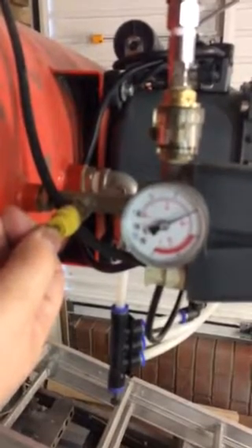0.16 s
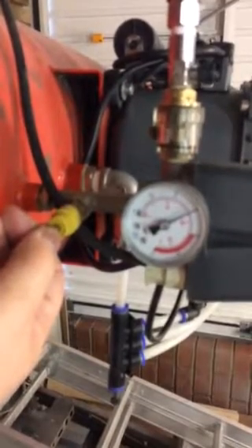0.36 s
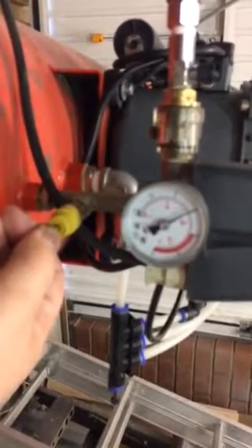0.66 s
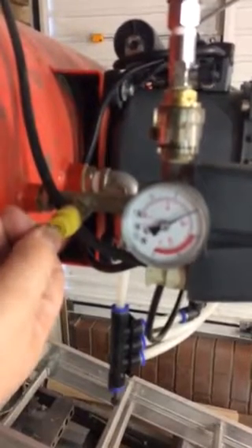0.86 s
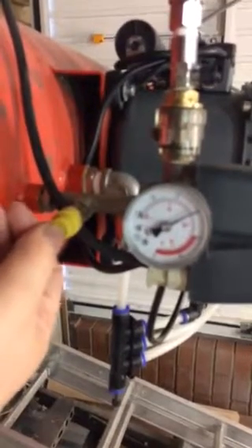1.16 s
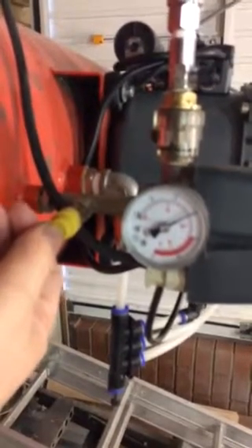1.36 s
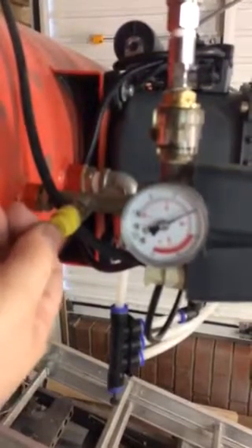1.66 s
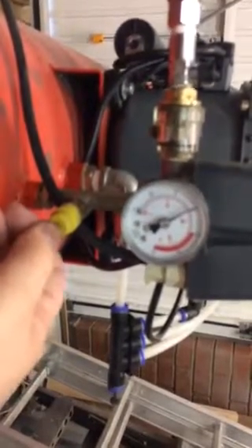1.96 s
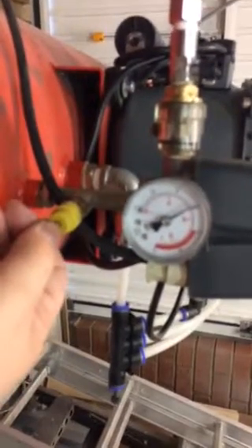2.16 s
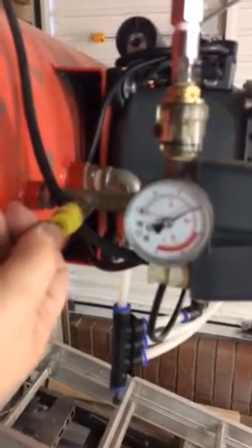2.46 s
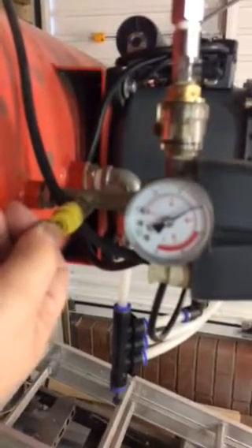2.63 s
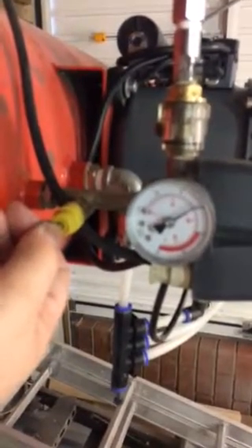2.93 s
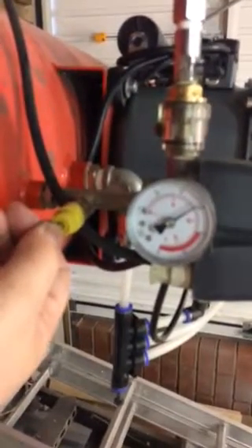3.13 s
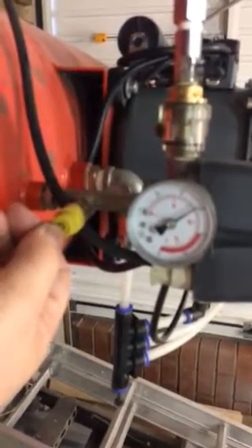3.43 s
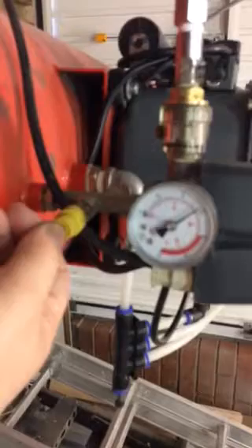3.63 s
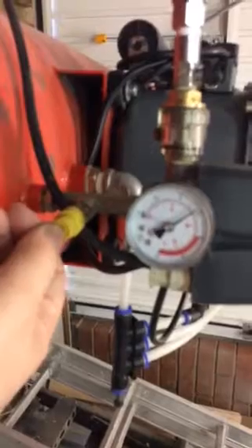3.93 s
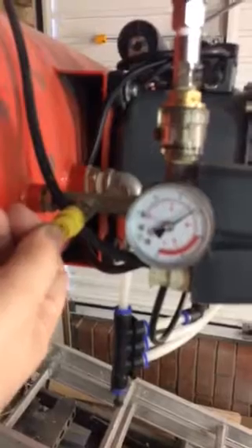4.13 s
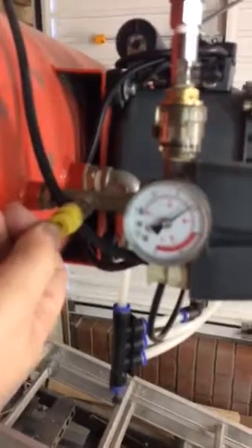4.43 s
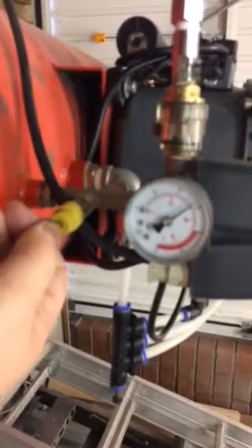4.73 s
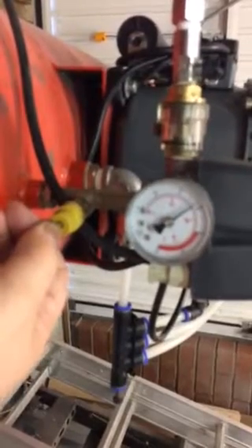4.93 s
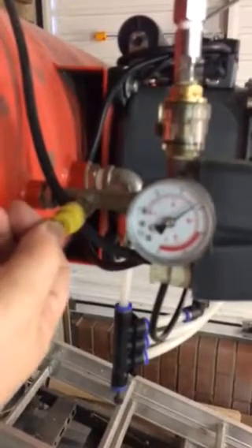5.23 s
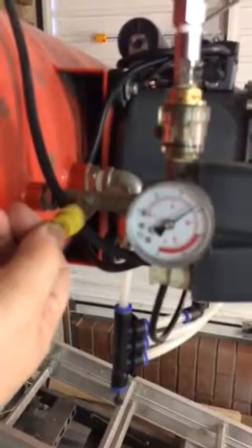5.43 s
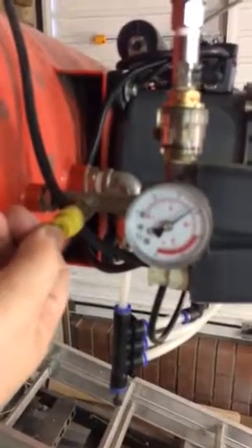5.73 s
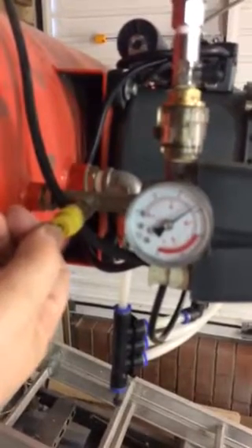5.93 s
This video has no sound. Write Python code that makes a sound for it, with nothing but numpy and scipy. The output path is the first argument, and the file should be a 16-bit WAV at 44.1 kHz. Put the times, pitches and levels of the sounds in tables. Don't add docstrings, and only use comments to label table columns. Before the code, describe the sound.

Sound starts in mid-blast: a loud, dense, steady roar of compressed air, broad from low mids to bright hiss, with uneven low buffeting on the close microphone. At 0.9 s it shuts abruptly with a low rebound thump and a short wall ring of about 0.3 s. The quiet gap holds faint distant hum and street rumble, recovering after the blast and swelling around 1.5-1.8 s. A faint tick and thin bright hiss begin near 1.9 s, rising into a thump and the long blast, 2.0-3.6 s. Quiet again, with a low rumble swell near 4.1 s. From 4.3 s the hiss grows, a dull clack and strong thump open a shorter blast, 4.5-5.3 s. After another quiet gap, a faint tick and leaking hiss from 5.8 s lead to a last blast at 5.9 s, still roaring at the end, about 6.1 s. Dry, close, essentially centred, slightly overloaded.

```python
import sys
import numpy as np
from scipy import signal
from scipy.fft import rfft, irfft, next_fast_len
from scipy.io import wavfile
from scipy.ndimage import uniform_filter1d

SR = 44100
rng = np.random.default_rng(int(sys.argv[2]) if len(sys.argv) > 2 else 0)


def waveform_to_disk(signal):
    frames = np.transpose(np.atleast_2d(signal))
    scaled = np.clip(frames, -1, 1) * 32767
    samples = np.round(scaled).astype(np.int16)
    wavfile.write(sys.argv[1], SR, samples)


def gain_from_db(level_db):
    decades = np.asarray(level_db, float) / 20
    return 10 ** decades


N = 268569
TIME = np.arange(N) / SR

# opens_s, shuts_s, wall_echo_db, closing_s, jet_level_db
BLASTS = [
    (-.1, 0.923, 0, .007, -13.0),
    (2.0141, 3.572, 0.1, 0.0019, -12.5),
    (4.4708, 5.274, -1.5, 0.011, -12),
    (5.9342, 6.16, 0, .005, -12.5),
]
# frequency_hz, density_db
JET_COLOUR = [(180, -37), (300, -15.5), (409, -1.5), (594, 0.5), (645, -0.5), (1360, -3.5), (1980, -3.5),
              (6510, -5.5), (12300, -10), (14700, -13.5)]
# frequency_hz, density_db
BUFFET_COLOUR = [(18, -41.5), (30, -26.5), (53, -4), (92, -2.5), (187, 0), (251, -1.5), (400, -3.5),
                 (520, -31.5), (880, -120)]
# frequency_hz, density_db
WALL_COLOUR = [(59, -33.5), (100, -2.5), (172, 0.5), (241, -12), (430, -9.5), (535, -4), (780, -11),
               (960, -5), (1300, -5.5), (1860, -3), (2700, -6), (3500, -6), (8700, -8.5), (15000, -7.5)]
# frequency_hz, t60_s
WALL_T60 = [(300, 0.22), (1000, .3), (3000, 0.31), (8000, 0.28), (15000, 0.21)]
# frequency_hz, density_db
HUM_COLOUR = [(180, -31), (300, -2), (342, -9.5), (450, -4), (512, -8.5), (732, -5), (875, -8), (965, -1.5),
              (1100, -6.5), (1700, -13.5), (2400, -23), (3300, -32), (5000, -34), (14500, -35)]
# frequency_hz, density_db
RUMBLE_COLOUR = [(15, -35), (25, -3), (48, 3), (108, -4.5), (184, -0.5), (320, -18.5), (420, -48.5),
                 (700, -120)]
# frequency_hz, density_db
LATE_COLOUR = [(700, -20), (1100, -3), (1900, -2), (2800, -6.5), (4500, -17), (9000, -29.5)]
# centre_s, lift_db
SWELLS = [
    (1.52, 6),
    (1.665, 3.0),
    (1.78, 5.0),
    (4.085, 4.0),
]
# surge_db, opening_kick_db, shutting_rebound_db, kick_lag_s
THUMPS = [
    (-90, -90, -19, .002),
    (-13, -11.5, -14.5, .0030),
    (-16, -7, -19, .0030),
    (-15.5, -16, -90, 0.0011),
]
# start_s, level_db
FLUTTERS = [
    (2.0035, -27),
    (4.46, -25),
    (4.465, -17),
    (5.928, -18),
]
# start_s, peak_db, centre_hz
TICKS = [
    (1.903, -53, 7000),
    (4.4675, -21, 700),
    (5.844, -50, 6000),
]
# time_s, level_db
LEAK = [
    [(1.85, -87), (1.882, -59), (1.962, -62), (1.982, -36.5), (2.012, -29.5)],
    [(4.32, -82), (4.334, -69), (4.374, -72), (4.42, -47.5), (4.428, -35.5), (4.468, -28)],
    [(5.81, -84), (5.85, -52.5), (5.858, -42), (5.87, -39), (5.922, -33.5), (5.93, -23), (5.934, -39)],
]
# frequency_hz, density_db
LEAK_COLOUR = [(2800, -38), (6500, -7.5), (7580, -10.5), (8300, -4.5), (10500, -4.5), (12400, -2),
               (15000, -10.5)]
# frequency_hz, density_db
LEAK_LOW = [(590, -46.5), (1000, -15.5), (1770, -8), (2190, -12.5), (2840, -12), (3170, -8), (4190, -6.5),
            (4720, -2), (7500, -6.5), (9750, -32), (16500, -120)]
# frequency_hz, density_db
SEAL_WHISTLE = [(3900, -40), (4500, -4.5), (4750, 0.5), (5000, -7), (5800, -38)]

OPEN_S = 0.0043
SETTLE_DB, SETTLE_S = -1.9, 0.041
BUFFET_DB, GUST_DB, GUSTS_PER_S = -17.0, 1.04, 5.6
WALL_DB, NEAR_DB, NEAR_T60_S = -27, -22, 0.03
HUM_DB, RUMBLE_DB, RUMBLE_RISE_DB_PER_S = -62, -63.5, 8.5
SWELL_S = 0.033
LATE_DB, LATE_T60_S = -61, 2.5
DUCK_DB, HOLD_S, RECOVER_S = -8, .285, .04
SURGE_S = .006
KICK_HZ, KICK_T60_S = 110., 0.018
REBOUND_HZ, REBOUND_T60_S, REBOUND_LEAD_S = 80., 0.038, 0.0014
FLUTTER_HZ, FLUTTER_T60_S = 125., 0.025
CUTOFF_HZ = 15330
FRAME, GRID = 1024, 256
SWAP_EVERY = 5
SWAP_LOW_HZ, SWAP_HIGH_HZ, SWAP_WIDTH_HZ = 4800, 11800, 1250
SWAP_DB, SWAP_TILT_DB_PER_KHZ = -24, -.6


def rms_one(x):
    return x / np.sqrt(np.mean(x ** 2) + 1e-20)


def at_hz(points, hz):
    table = np.array(points)
    return np.interp(np.log(hz), np.log(table[:, 0]), table[:, 1])


def noise(colour):
    size = next_fast_len(N)
    hz = np.arange(size // 2 + 1) * SR / size + 1
    spectrum = rfft(rng.standard_normal(size)) * gain_from_db(at_hz(colour, hz))
    return rms_one(irfft(spectrum, size)[:N])


def drift(rate):
    r = np.exp(-80 * np.pi * rate / SR)
    white = rng.standard_normal(N // 40 + 2002)
    slow = signal.lfilter([1], [1, -2 * r, r * r], white)[2000:]
    return np.interp(np.arange(N) / 40, np.arange(len(slow)), rms_one(slow))


def latest(column):
    rows = np.array(BLASTS)
    return rows[np.searchsorted(rows[:, 0], TIME) - 1, column]


def opening(fall=None, late=0):
    total = 0
    for opens, shuts, _, closing, _ in BLASTS:
        rising = (TIME - opens) / OPEN_S
        falling = 1 - (TIME - shuts - late) / (fall or closing)
        total = total + np.clip(np.minimum(rising, falling), 0, 1)
    return total


def jet():
    level_db = latest(column=4) + SETTLE_DB * np.exp(-(TIME - latest(column=0)) / SETTLE_S)
    roar = noise(JET_COLOUR) * gain_from_db(0.46 * drift(20) + 0.23 * drift(4.0))
    buffet = noise(BUFFET_COLOUR) * gain_from_db(BUFFET_DB + GUST_DB * drift(GUSTS_PER_S) + 2.4 * drift(16))
    return opening() ** 2 * gain_from_db(level_db + 0.26) * (roar + buffet)


def echo_db():
    return latest(column=2)


def walls():
    out, power = 0, opening() ** 2
    edges = 100 * 2 ** np.arange(0, 7.6, .5)
    field = [noise(WALL_COLOUR), noise(WALL_COLOUR)]
    for k, (low, high) in enumerate(zip(edges, edges[1:])):
        energy = 0
        far_t60 = at_hz(WALL_T60, np.sqrt(low * high))
        for db, t60 in (WALL_DB, far_t60), (NEAR_DB, NEAR_T60_S):
            r = gain_from_db(-120 / (t60 * SR))
            energy = energy + gain_from_db(2 * db) * signal.lfilter([1 - r], [1, -r], power, zi=[r])[0]
        band_pass = signal.butter(2, [low, min(high, .45 * SR)], "band", fs=SR, output="sos")
        out = out + np.sqrt(energy) * signal.sosfilt(band_pass, field[k % 2])
    return out * gain_from_db(echo_db())


def garage():
    since = np.maximum(TIME - latest(column=1), 0)
    swell_db = sum(db * np.exp(-((TIME - s) / SWELL_S) ** 2) for s, db in SWELLS)
    hum = noise(HUM_COLOUR) * gain_from_db(HUM_DB + .8 * drift(10))
    rumble_db = RUMBLE_DB + RUMBLE_RISE_DB_PER_S * since + swell_db
    rumble = noise(RUMBLE_COLOUR) * gain_from_db(rumble_db + 1.5 * drift(12))
    late = noise(LATE_COLOUR) * gain_from_db(LATE_DB + echo_db() - 60 * since / LATE_T60_S)
    return (hum + rumble + late) * gain_from_db(DUCK_DB * opening(RECOVER_S, late=HOLD_S))


def swing(s, db, hz, t60):
    age = np.maximum(TIME - s, 0)
    return gain_from_db(db + 4.0 - 60 * age / t60) * np.sin(2 * np.pi * hz * age)


def ticks():
    out, white = 0, rng.standard_normal(N)
    for s, db, hz in TICKS:
        band_pass = signal.butter(2, [hz / 1.6, hz * 1.4], "band", fs=SR, output="sos")
        clack = rms_one(signal.sosfilt(band_pass, white))
        out = out + clack * (TIME > s) * gain_from_db(db - 60 * np.abs(TIME - s) / .005)
    return out


def thumps():
    out = sum(swing(s, db, FLUTTER_HZ, FLUTTER_T60_S) for s, db in FLUTTERS)
    for (opens, shuts, *_), (surge_db, kick_db, rebound_db, lag) in zip(BLASTS, THUMPS):
        kick_s = opens + lag
        out += gain_from_db(surge_db) * (TIME < kick_s) * np.exp(np.minimum(TIME - kick_s, 0) / SURGE_S)
        out += swing(shuts - REBOUND_LEAD_S, rebound_db, REBOUND_HZ, REBOUND_T60_S)
        out -= swing(kick_s, kick_db, KICK_HZ, KICK_T60_S)
    return signal.sosfilt(signal.butter(2, 450, fs=SR, output="sos"), out)


def leak():
    lifting = 0
    for rows, (opens, *_) in zip(LEAK, BLASTS[1:]):
        lifting = lifting + (TIME > rows[0][0]) * (TIME < opens + OPEN_S)
    time_s, table_db = np.transpose(np.vstack(LEAK))
    level_db = np.interp(TIME, time_s, table_db)
    hiss = gain_from_db(level_db - 2.0) * noise(LEAK_COLOUR)
    lower = gain_from_db(1.45 * (level_db + 34.0) - 42) * (noise(LEAK_LOW) + gain_from_db(-9.5) * noise(SEAL_WHISTLE))
    draught = gain_from_db(1.9 * (level_db + 29.5) - 44) * noise(BUFFET_COLOUR)
    return lifting * (hiss + lower + draught)


def dropouts(x):
    hz, s, cells = signal.stft(x, SR, nperseg=FRAME)
    chance = uniform_filter1d(rng.standard_normal(cells.shape), size=10, axis=1)
    chance = uniform_filter1d(chance, size=4, axis=0)
    loud = np.interp(s, TIME, opening())
    threshold = np.interp(hz, [8000, 12500, 15000], [3.2, 2.0, 1.3])[:, None]
    starved = rms_one(chance) > threshold
    return signal.istft(cells * (1 - .9 * starved * loud), SR, nperseg=FRAME)[1][:N]


def swapped_bands(mid):
    side, loss = np.zeros((2, N + 4 * FRAME))
    padded = np.pad(mid, 2 * FRAME)
    starts = np.arange(GRID - FRAME, N - FRAME, FRAME)
    chance, draws = rng.random((len(starts), 3)), rng.standard_normal((len(starts), FRAME))
    frame = np.arange(len(starts))
    turn = (SWAP_EVERY * chance[frame - frame % SWAP_EVERY, 0]).astype(int)
    aperture = opening()
    loud = aperture[np.maximum(starts - FRAME, 0)] * aperture[starts + FRAME] > .5
    picked = (frame % SWAP_EVERY == turn) & loud
    n = np.arange(2 * FRAME) + .5
    window = np.sin(np.pi * n / (2 * FRAME))
    for start, (_, place, breadth), draw in zip(starts[picked] + 2 * FRAME, chance[picked], draws[picked]):
        hz = SWAP_LOW_HZ + place * (SWAP_HIGH_HZ - SWAP_LOW_HZ)
        width = SWAP_WIDTH_HZ * (.8 + breadth ** 3)
        low, high = (round(edge * 2 * FRAME / SR) for edge in (hz - width / 2, hz + width / 2))
        lines = np.arange(low, high)
        waves = np.cos(np.pi / FRAME * np.outer(lines + .5, n + FRAME / 2)) * window
        db = SWAP_DB + SWAP_TILT_DB_PER_KHZ * (hz - SWAP_LOW_HZ) / 1000
        db += 10 * np.log10(width / SWAP_WIDTH_HZ)
        at = slice(start, start + 2 * FRAME)
        side[at] += gain_from_db(db - 1.5) * rms_one(draw[lines] @ waves) * np.sqrt(.5)
        loss[at] += 0.21 * (waves @ padded[at]) @ waves * 2 / FRAME
    return side[2 * FRAME:-2 * FRAME], loss[2 * FRAME:-2 * FRAME]


def scene():
    mid = jet() + walls() + garage() + thumps() + ticks() + leak()
    return np.array([mid, mid])


def band_limit(x):
    return signal.sosfilt(signal.butter(12, 16530, fs=SR, output="sos"), x)


def record(dry):
    bent = dry + .07 * dry ** 2
    rounded = bent / (1 + np.abs(bent / .78) ** 4) ** .25
    rounded = signal.sosfilt(signal.butter(2, 35, "high", fs=SR, output="sos"), rounded)
    taps = signal.firwin(1201, CUTOFF_HZ, window=("kaiser", 9), fs=SR)
    cut = dropouts(signal.fftconvolve(rounded[0], taps, "same"))
    side, loss = swapped_bands(cut)
    return band_limit(cut - loss + side * [[1], [-1]])


dry = scene()
out = record(dry)
waveform_to_disk(out)
```